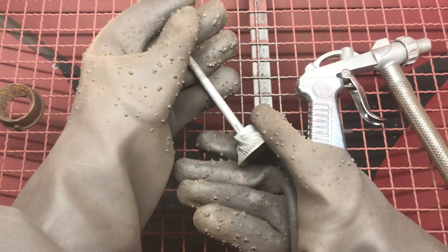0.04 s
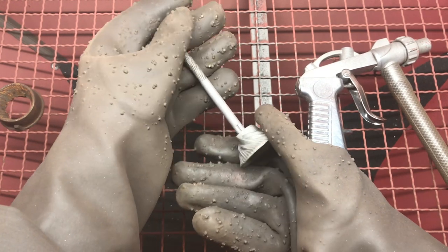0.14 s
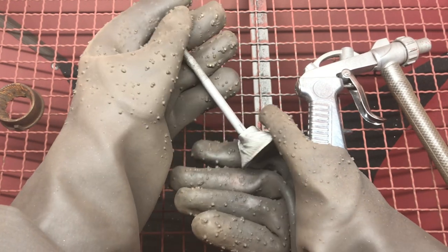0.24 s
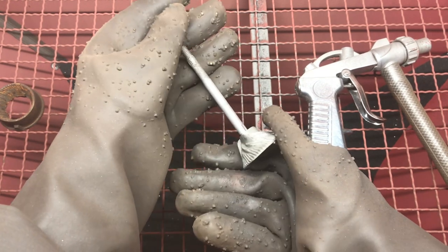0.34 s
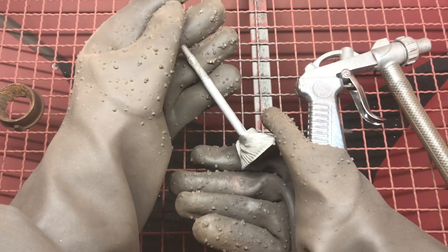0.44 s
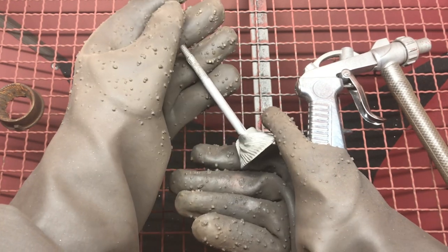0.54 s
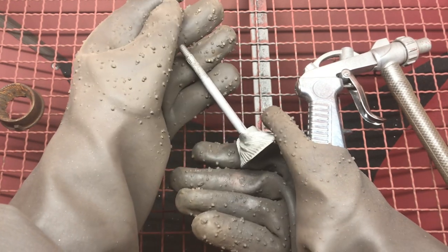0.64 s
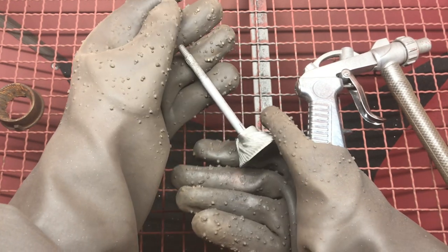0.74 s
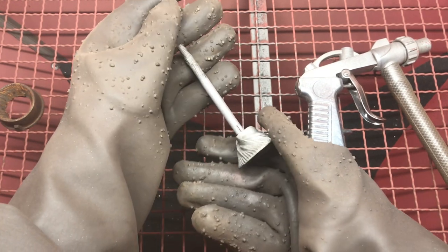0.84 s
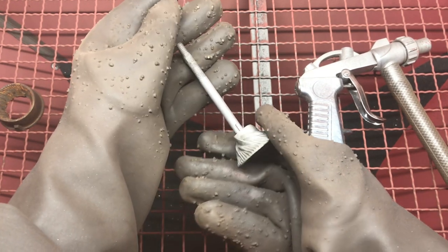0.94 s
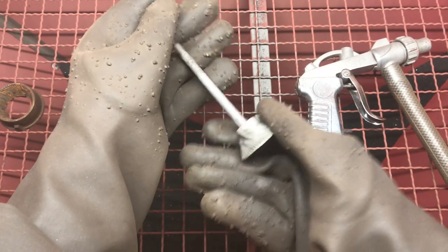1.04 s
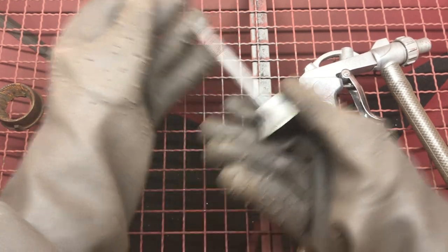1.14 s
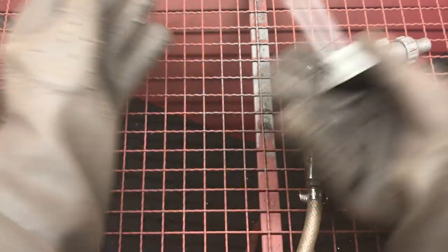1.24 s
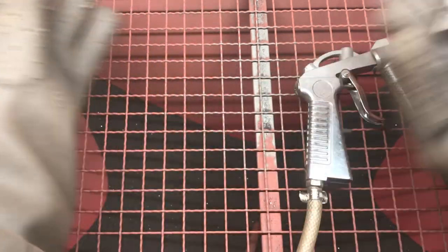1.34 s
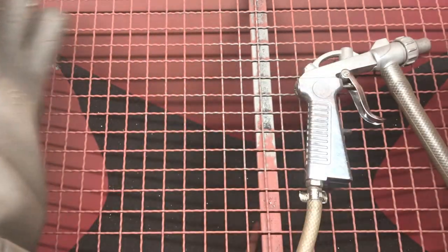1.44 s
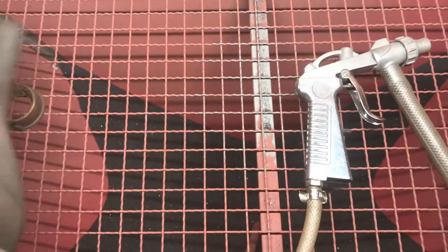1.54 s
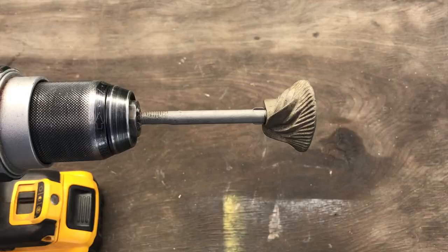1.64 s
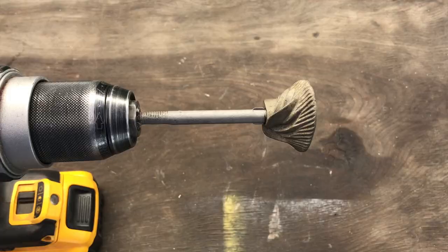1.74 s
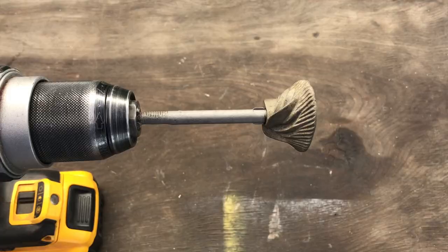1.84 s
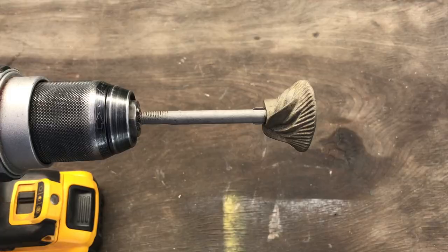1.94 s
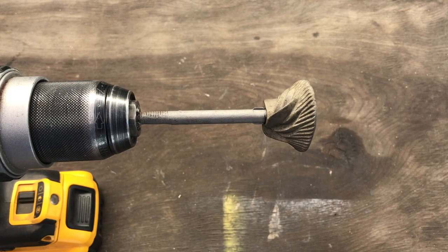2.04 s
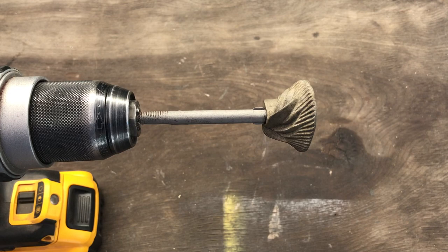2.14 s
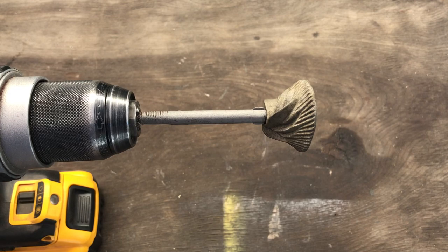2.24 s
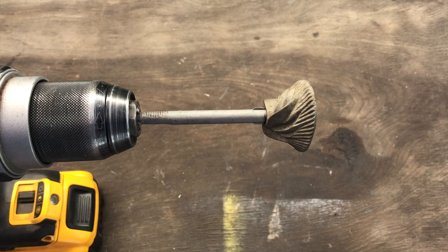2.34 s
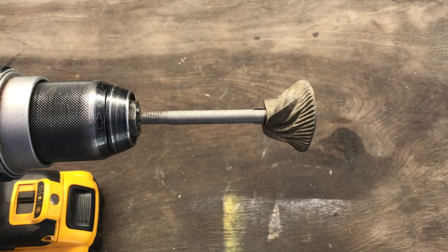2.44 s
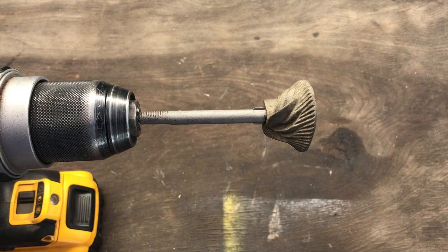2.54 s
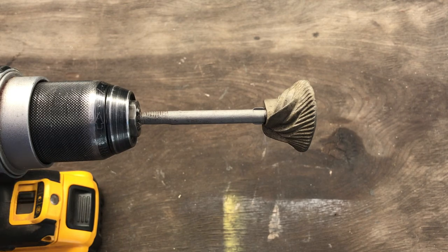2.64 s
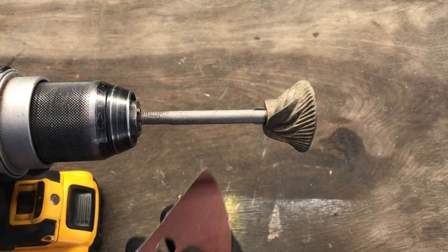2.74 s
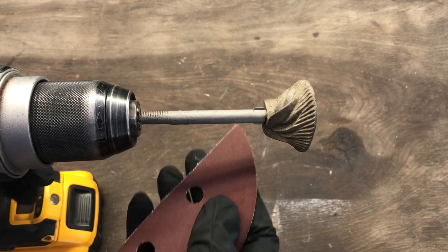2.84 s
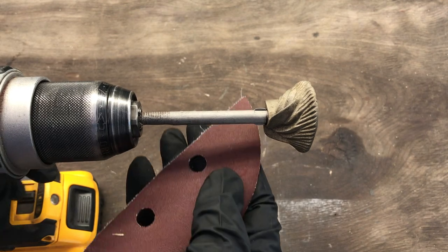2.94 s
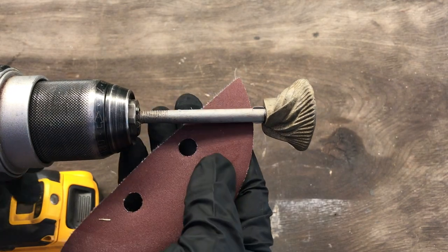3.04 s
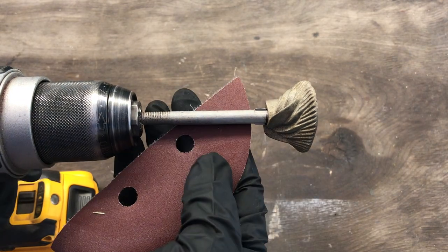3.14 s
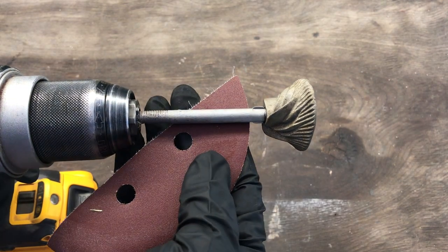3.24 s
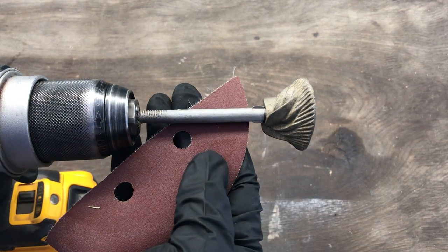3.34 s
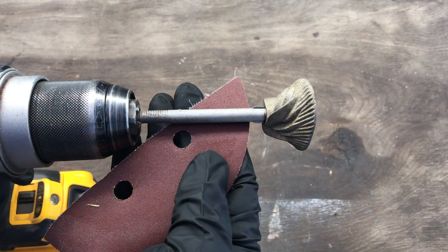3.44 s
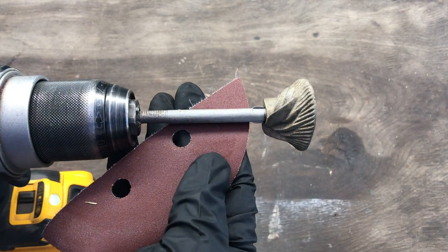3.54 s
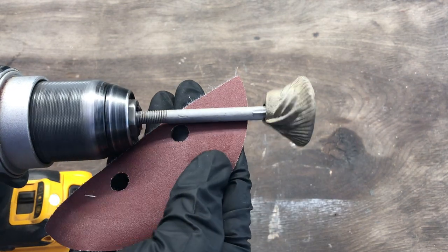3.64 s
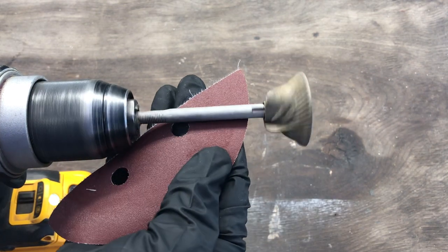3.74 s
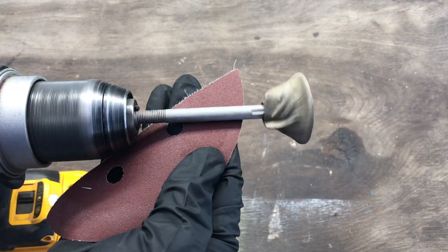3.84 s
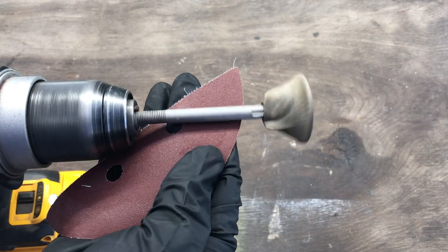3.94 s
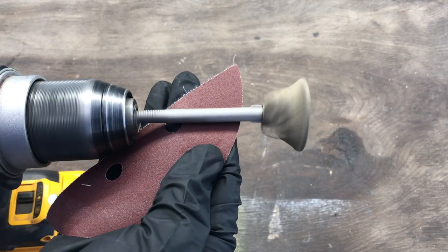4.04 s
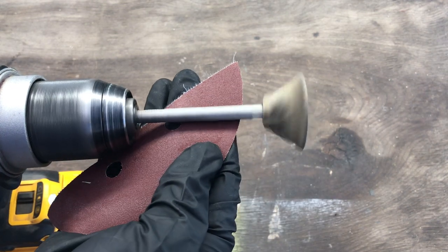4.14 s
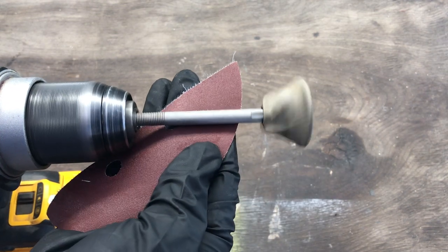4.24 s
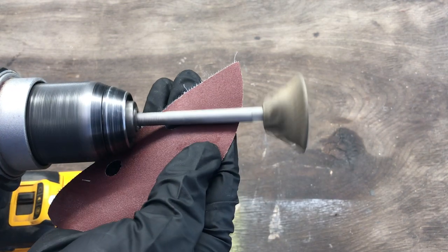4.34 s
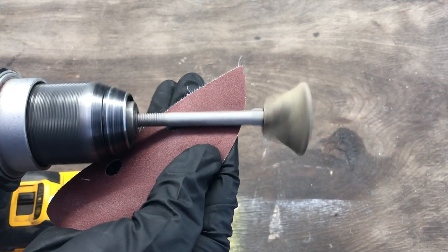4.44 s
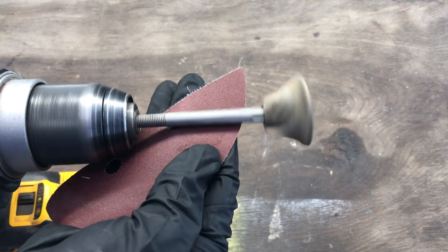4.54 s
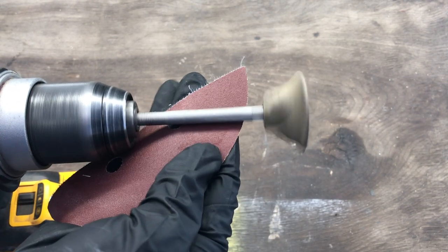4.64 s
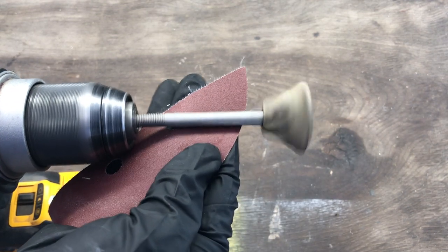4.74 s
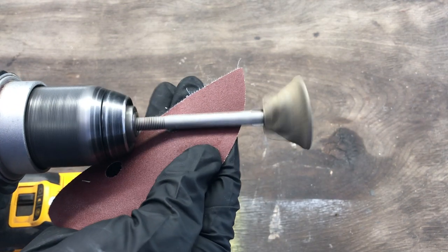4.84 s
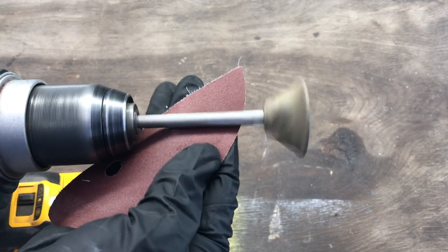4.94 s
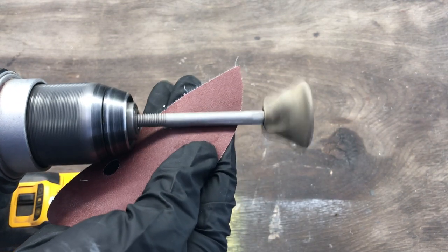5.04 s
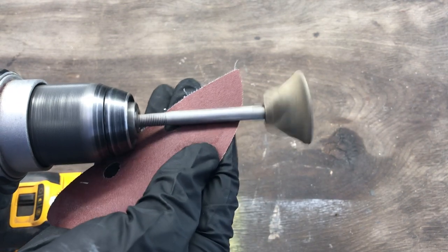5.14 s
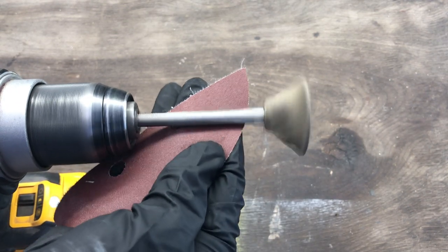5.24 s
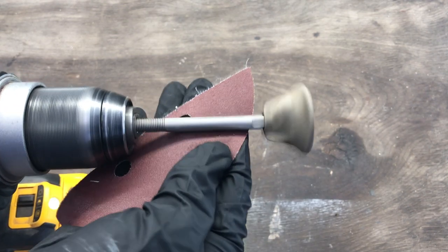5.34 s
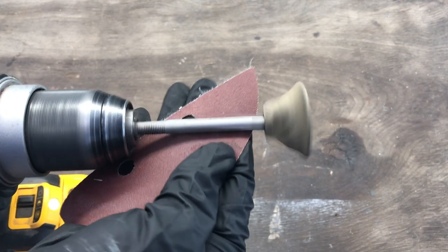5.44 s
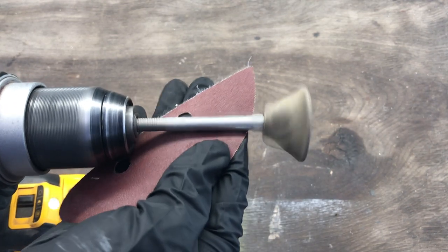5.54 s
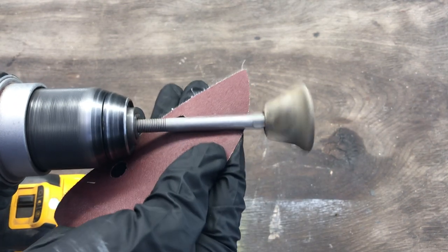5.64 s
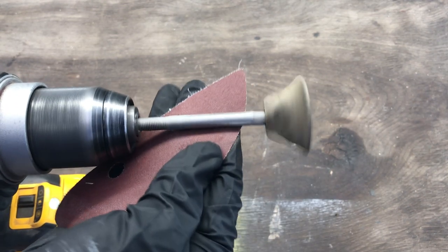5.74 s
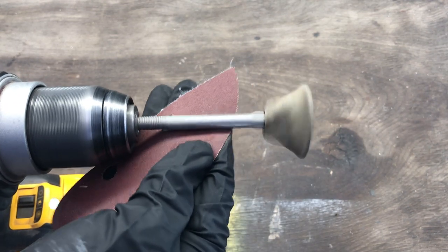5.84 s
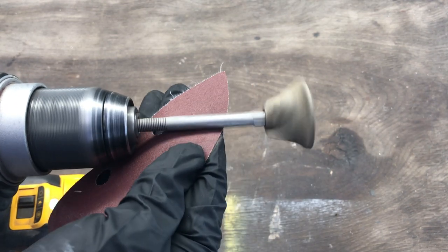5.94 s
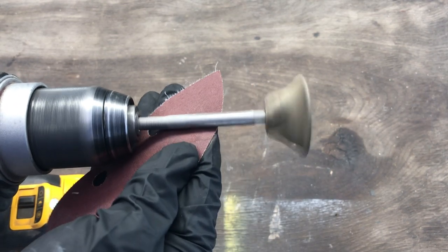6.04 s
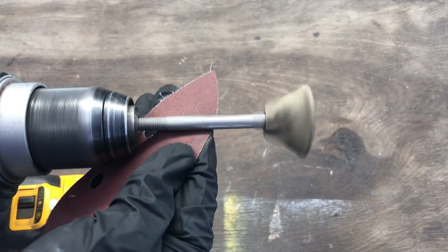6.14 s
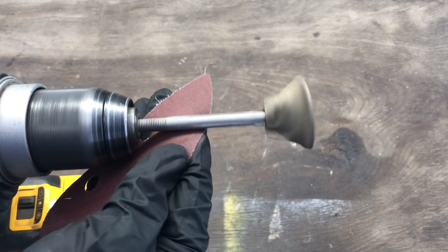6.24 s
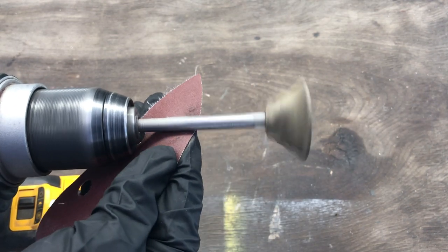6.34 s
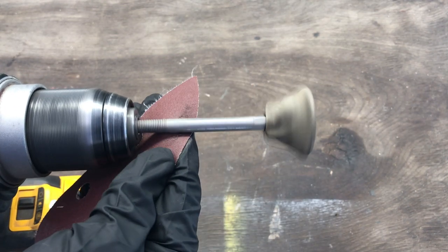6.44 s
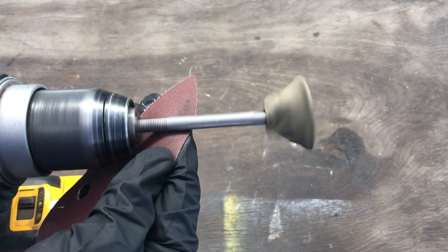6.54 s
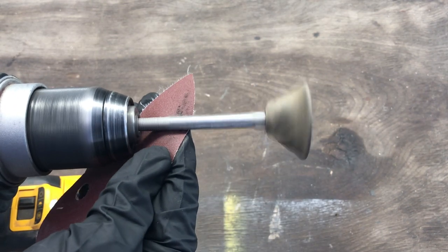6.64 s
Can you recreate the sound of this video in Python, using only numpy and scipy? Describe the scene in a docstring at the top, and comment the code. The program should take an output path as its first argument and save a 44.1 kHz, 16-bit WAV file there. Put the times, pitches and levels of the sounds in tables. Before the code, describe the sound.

A dust extractor drones and cuts off, then paper rustles on a quiet bench before a cordless drill whines up with hissing sandpaper.

```python
"""At a blasting cabinet standing idle, the dust extractor drones in steady tones and air noise rings in the
box. Then the scene changes to a quiet workshop bench that fades in, distant rumble behind it, all on one
microphone. Gloves and sandpaper rustle as shaped noise, a hand thuds softly and stiff paper snaps in bright
ticks. A trigger clicks in the modes of its grip, and a cordless drill spins up in steps: multiples of the rotor
rate whine through the casing over gear noise, while paper rubs the turning steel shaft with a throbbing hiss."""
import sys
import numpy as np
from scipy import signal
from scipy.fft import rfft, irfft
from scipy.io import wavfile

SR = 44100
rng = np.random.default_rng(int(sys.argv[2]) if len(sys.argv) > 2 else 0)


def natural_amplitude(level_db):
    """Convert a level in decibels to a linear amplitude factor, elementwise."""
    exponent = np.asarray(level_db, float) / 20
    return 10 ** exponent


def file_out(sig):
    """Save sig as 16-bit WAV at sys.argv[1]."""
    # one column per channel
    cols = np.atleast_2d(sig).T
    # limit, then scale
    lim = np.clip(cols, -1, 1)
    pcm = np.round(lim * 32767).astype(np.int16)
    wavfile.write(sys.argv[1], SR, pcm)


N = 295470
TIME_S = np.arange(N) / SR
CABINET_ENDS_S, TRIGGER_S = 1.674, 3.5527
FULL_SPEED_HZ = 385  # rotor turns per second to which the drill levels refer


def at_hz(points, hz):
    """A spectrum table read on a log-frequency axis."""
    table_hz, table_db = np.transpose(points)
    return np.interp(np.log(np.maximum(hz, 1)), np.log(table_hz), table_db)


def rms_one(x):
    """Scale to unit rms."""
    return x / np.sqrt(np.mean(x ** 2) + 1e-20)


def white():
    """Flat noise over the whole take."""
    return rng.standard_normal(N)


def drift(rate):
    """Slow random wander of unit rms: noise through a double one-pole low-pass at rate Hz."""
    stride = 40  # samples per coarse step
    r = np.exp(-2 * np.pi * rate * stride / SR)
    coarse = rng.standard_normal(N // stride + 2002)
    slow = signal.lfilter([1], [1, -2 * r, r * r], coarse)[2000:]  # drop the settling
    return np.interp(np.arange(N) / stride, np.arange(len(slow)), rms_one(slow))


def coloured(x, spectrum, peaks=(), edge_db=-25):
    """Give x a spectrum with resonances on top, changed by edge_db an octave below the table. Rms 1."""
    hz = np.fft.rfftfreq(N, 1 / SR)
    lowest_hz, lowest_db = spectrum[0]
    db = at_hz([(lowest_hz / 2, lowest_db + edge_db)] + list(spectrum), hz)
    for centre, width, top in peaks:
        db = db + top / (1 + (2 * (hz - centre) / width) ** 2)
    return rms_one(irfft(rfft(x) * natural_amplitude(db), N))


def grains(per_s, spread_db):
    """Random clicks of uneven size and either sign, together of unit rms."""
    sizes = natural_amplitude(spread_db * np.minimum(rng.exponential(1, N), 5)) * rng.choice([-1, 1], N)
    return rms_one(sizes * (rng.random(N) < per_s / SR))


def after(s, fade):
    """0 before a moment, rising to 1 over the fade."""
    return np.clip((TIME_S - s) / fade, 0, 1)


def drill():
    """Rotor tones, gear noise, sanding hiss and bench rumble follow the stepped speed and the strain."""
    # rotor speed as the trigger is squeezed in steps: t/s, f/Hz (turns per second)
    speed_steps = [(3.56, 45), (3.7, 63), (3.725, 67.5), (3.832, 71.5), (3.85, 79), (3.905, 87),
                   (3.918, 153), (3.948, 184), (3.976, 197.4), (4.03, 204), (4.09, 206), (4.125, 220),
                   (4.162, 262), (4.2, 290), (4.335, 296), (4.35, 345), (4.363, 384), (4.376, 394),
                   (4.42, 385.6), (4.5, 384.5)]
    gear_ratio = 11.42  # rotor turns per chuck turn
    speed = np.interp(TIME_S, *np.transpose(speed_steps))
    chuck_hz = speed / gear_ratio
    chuck = 2 * np.pi * np.cumsum(chuck_hz) / SR
    octaves = np.log2(speed / FULL_SPEED_HZ)
    # the speed shakes at random and once per chuck turn, and the planet stage shakes it once per two
    shake = .001 * drift(12) + .0016 * np.sin(chuck) + .002 * np.sin(chuck / 2 + drift(3))
    speed = speed * (1 + shake)
    octaves = np.log2(speed / FULL_SPEED_HZ)
    rotor = 2 * np.pi * np.cumsum(speed) / SR

    wake_s = 0.26
    asleep = np.exp(-(np.maximum(TIME_S - TRIGGER_S, 0) / wake_s) ** 2)
    effort = strain()

    def layer_db(full_db, octave_db, strain_db, start_db):
        """Level at full speed, its rise per octave and with full strain, less the hold-back at first touch."""
        return full_db + octave_db * octaves + strain_db * effort - start_db * asleep

    # later the hiss sinks, perhaps as the paper wears smooth, while the gear noise grows
    worn_s = np.maximum(TIME_S - 5.7, 0)
    tone_db = layer_db(3.57, 2.45, 1.4, 18)
    gear_db = layer_db(-44, 4.5, 5, -3) + 2.1 * worn_s + 0.59 * drift(2.5)  # a little louder at the start
    hiss_db = layer_db(-43, 1.44, 5, 8.5) - 1.5 * worn_s + 0.14 * drift(8.3) - octaves * drift(33)
    bench_db = layer_db(-58.5, 0.1, 3.5, 7.5) + 0.5 * drift(4.1)

    tones = motor_whine(speed, rotor, octaves) + gearbox_hum(rotor, chuck, octaves)
    layers = np.sqrt(2) * natural_amplitude(tone_db) * tones
    layers += natural_amplitude(gear_db) * gear_noise(rotor, chuck)
    layers += natural_amplitude(hiss_db) * sanding_hiss(rotor, chuck, chuck_hz)
    layers += natural_amplitude(bench_db) * bench_rumble()
    layers += controller_whistle(effort)
    return after(TRIGGER_S, 0.0047) * layers


def strain():
    """The finger squeezes further and the motor strains: each surge rises fast, then eases, by one law."""
    # t/s of greatest strain, strength 0-1
    squeezes = [(3.715, 0.74), (3.845, 1), (3.922, 0.6), (4.15, 0.4), (4.37, 0.42)]
    rise_s, fall_s = 0.023, 0.069
    effort = np.zeros(N)
    for s, size in squeezes:
        decay = np.where(TIME_S < s, ((s - TIME_S) / rise_s) ** 2, (TIME_S - s) / fall_s)
        effort += size * np.exp(-decay)
    return effort


def motor_whine(speed, rotor, octaves):
    """Multiples of the rotor rate, louder at casing resonances, broken and rough at low speed."""
    # the windings pull at any speed; unbalance puts neighbours beside them only near full speed
    # multiple of the rotor rate (rounded for the tone, as written for the casing),
    # relative level/dB at full speed, gain/dB per octave of speed
    orders = [(0.97, -40.5, 3), (1.95, -56, 12), (3.08, -58, 6), (4.05, -47, 2), (5.1, -48.5, 1),
              (6.945, -53.5, 25), (7.88, -38, 11), (9.05, -53, 36), (10.24, -50, -2), (11.1, -50.5, 34),
              (12.5, -62, -7), (14, -60, -6), (15, -42.5, 61), (16.49, -41, 0), (17.11, -48.5, 39),
              (19.48, -59, -10.5), (23, -57, 33), (24.1, -64, 21)]
    # how well the casing radiates a tone: f/Hz, relative level/dB
    casing = [(60, -25), (200, -14.5), (385, -10.5), (640, -19.5), (830, -6.5), (1100, -2.5), (1380, -9.5),
              (1600, -21.5), (1950, -27), (2400, -11.5), (3080, -0.5), (3700, -11.5), (4300, -9),
              (4750, -31), (6100, -9)]
    slot_order, start_up_hz, mute_db = 16, 120, 11
    # below the start-up speed only the slot tone stands out
    starting = 1 / (1 + (speed / start_up_hz) ** 8)
    whine = np.zeros(N)
    for k, db, slope_db in orders:
        tone_db = db + slope_db * octaves + at_hz(casing, k * speed)
        if round(k) != slot_order:
            tone_db = tone_db - mute_db * starting
        rough_db = (1.0 - 0.74 * octaves) * drift(37)
        whine += natural_amplitude(tone_db + rough_db) * np.sin(round(k) * rotor + 2 * np.pi * rng.random())
    return whine * after(3.7, 0.026)


def gearbox_hum(rotor, chuck, octaves):
    """Multiples of the chuck rate hum, and the gearbox beats against the rotor."""
    # multiple of the chuck rate, relative level/dB at full speed
    orders = [(2, -71.5), (4, -65.5), (5.5, -74.5)]
    hum = sum(natural_amplitude(db + 32 * octaves + 3.1 * drift(26)) * np.sin(k * chuck) for k, db in orders)
    return hum + natural_amplitude(-60) * np.sin(rotor) * np.sin(2 * chuck)


def gear_noise(rotor, chuck):
    """Broad noise of the gears, throbbing with rotor and chuck."""
    # f/Hz, relative level/dB per Hz
    spectrum = [(200, -21), (300, -7.5), (504, -12), (701, -16.5), (1000, -10), (1350, -4.5), (1600, -12.5),
                (2100, -13), (2900, -6), (3500, -9.5), (4210, -2.5), (5000, -13.5), (7000, -25),
                (15700, -36), (16100, -78)]
    throb = (1 + 0.39 * np.sin(rotor)) * (1 + 0.067 * np.sin(chuck))
    return coloured(white() * throb, spectrum, edge_db=-9)


def sanding_hiss(rotor, chuck, chuck_hz):
    """Grit rubbing the shaft: noise and scattered grains that throb with rotor and chuck."""
    # f/Hz, relative level/dB per Hz
    spectrum = [(3500, -7), (4500, -34), (5300, -10.5), (6200, -5.5), (7300, -8.5), (8900, -5),
                (10600, -14.5), (12500, -7.5), (13800, -12.5), (15300, -8), (16100, -46), (16500, -66)]
    grains_per_s = 30 * chuck_hz * natural_amplitude(4 * drift(37))
    grit = white() + .5 * grains(grains_per_s, spread_db=1.0)
    throb = (1 + 0.051 * np.sin(rotor + 1)) * (1 + 0.058 * np.sin(chuck + 2))
    return coloured(grit * throb, spectrum)


def bench_rumble():
    """Low noise of the bench top shaken by the drill."""
    # f/Hz, relative level/dB per Hz
    spectrum = [(40, -28), (65, -1), (100, -28), (150, -3.5), (220, -0.5), (330, -20), (600, -43)]
    return coloured(white(), spectrum)


def controller_whistle(effort):
    """The speed controller whistles at part throttle, swelling just after the strain, then quits."""
    # f/Hz, relative level/dB
    tones = [(11014, -8), (11262, -7)]
    lag_s = 0.01
    swell = np.interp(TIME_S - lag_s, TIME_S, effort) ** 2 * (1 - after(3.84, .04))
    whistle = sum(natural_amplitude(db + 3.5 * drift(28)) * np.sin(2 * np.pi * hz * TIME_S) for hz, db in tones)
    return natural_amplitude(-44) * swell * whistle


def cabinet():
    """Extractor tones that waver one by one, over air noise ringing in the sheet-metal box."""
    # extractor tones: multiple of the turning rate, relative level/dB
    orders = [(1, -2.5), (2, -6), (3, -17), (4, -2), (8, -6), (9, -36), (10, 1.5), (11, 4), (13, -22),
              (39, -15), (85, -46), (86, -22), (87, -26), (88, -24), (89, -24), (90, -20)]
    # thin tones of the fan and duct: f/Hz, relative level/dB
    whistles = [(271.4, -3), (675.4, -8.5), (2252, -14.5), (2630, -13), (3138, -15), (4505, -25.5)]
    # air rush: f/Hz, relative level/dB per Hz
    rush_spectrum = [(34, -34), (58, -9.5), (130, -10), (185, -7), (223, -8), (487, -12.5), (548, -9.5),
                     (763, -15), (967, -7), (1590, -17.5), (2610, -13), (7560, -40), (13700, -45),
                     (15400, -42), (16500, -73)]
    # box and duct resonances: f/Hz, width/Hz, level/dB above the rush
    box = [(298, 29, 7.5), (377, 100, 15), (1070, 160, -1.5), (2000, 200, 5), (2700, 620, 6.5),
           (4200, 160, 1), (9570, 680, 10.5), (13350, 1500, 13)]
    turn_hz = 44.7  # mean turns per second
    turns = np.cumsum(turn_hz * (1 + .0002 * drift(1.5))) / SR
    tones = np.zeros(N)
    for k, db in orders:
        tones += natural_amplitude(db + 0.63 * drift(2.7)) * np.sin(2 * np.pi * (k * turns + rng.random()))
    seconds = turns / turn_hz  # the whistles share the unsteadiness of the turning
    for hz, db in whistles:
        tones += natural_amplitude(db + 2.84 * drift(3.3)) * np.sin(2 * np.pi * hz * seconds)
    rush = coloured(white(), rush_spectrum, box) * natural_amplitude(.35 * drift(8))
    return natural_amplitude(-49.5) * np.sqrt(2) * tones + natural_amplitude(-40) * rush


def trigger():
    """A sharp click and a short rattle strike the plastic modes of the grip."""
    # f/Hz, relative level/dB, 60 dB decay time t60/s
    modes = [(1330, -13, 0.016), (4100, -2, 0.0029), (5370, -15, 0.0053), (8240, -2, 0.002),
             (13200, -6, 0.0027), (247, -24, 0.019)]
    rattle_s = 0.011
    rattle = after(TRIGGER_S, 0.00039) * (1 - after(TRIGGER_S + rattle_s, 0.0029))
    out = np.zeros(N)
    for hz, db, t60 in modes:
        force = 0.38 * rattle * grains(3610, spread_db=4.5) + 1e-18
        force[round((TRIGGER_S + .0008) * SR)] += 3  # the click
        r, w = natural_amplitude(-60 / (t60 * SR)), 2 * np.pi * hz / SR
        out += natural_amplitude(db) * signal.lfilter([0, np.sin(w)], [1, -2 * r * np.cos(w), r * r], force)
    return natural_amplitude(-43) * out


def snaps():
    """Each snap of the stiff paper is a bright tick with a short noisy tail."""
    # t/s as the sheet starts to give, peak level/dB
    paper_snaps = [(2.6805, -59), (2.9386, -49), (3.0501, -43), (3.069, -32), (3.0738, -55), (3.1447, -55),
                   (3.1577, -43.5), (3.1955, -55), (3.2122, -39), (3.2668, -49), (3.2707, -40),
                   (3.2757, -51), (3.2895, -52), (3.2922, -55), (3.2974, -54), (3.3782, -34), (3.4655, -47),
                   (3.4864, -53), (3.5254, -48.5), (3.5917, -31.5), (3.6064, -28.5), (3.6194, -38),
                   (3.6331, -27), (3.6377, -35), (3.665, -32), (3.686, -36), (3.696, -37)]
    give_s, tail_share, tail_s = .0009, 0.12, 0.0022
    out, t = np.zeros(N), np.arange(600) / SR
    edge = signal.butter(2, [4900, 16500], "band", fs=SR, output="sos")
    for s, db in paper_snaps:
        tick = rng.standard_normal(600) * (np.exp(-t / 0.00031) + tail_share * np.exp(-t / tail_s))
        tick[0] += 2  # the break itself
        tick = signal.sosfilt(edge, tick)
        out[round((s + give_s) * SR):][:600] += natural_amplitude(db) * tick / np.abs(tick).max()
    return out


def handling():
    """Glove and paper rustle, dull and bright; once held, the sheet also crackles faintly throughout."""
    # dull swish: f/Hz, relative level/dB per Hz
    swish_spectrum = [(2400, -10), (3200, 5), (4300, -2), (6000, -19), (9000, -40)]
    # bright scuff: f/Hz, relative level/dB per Hz
    scuff_spectrum = [(2000, -33), (5500, -1.5), (9000, -5), (15000, -7), (16300, -23)]
    swish = natural_amplitude(0.37 * drift(37)) * coloured(white(), swish_spectrum)
    rough = white() + .4 * grains(900 * natural_amplitude(4 * drift(25)), spread_db=3.0)
    scuff = coloured(rough, scuff_spectrum) * natural_amplitude(2.4 * drift(30))
    held = after(2.4, .02) * natural_amplitude(-86 + 4.5 * drift(11))
    dull = rustle(column=2, sag_db_per_s=60) * swish
    bright = (rustle(column=3, sag_db_per_s=23) + held) * scuff
    return dull + bright


def rustle(column, sag_db_per_s):
    """Each rustle rises, sags in level after its rise, and lets go (worked out every millisecond)."""
    # start t/s, hold/s, dull swish level/dB, bright scuff level/dB
    moves = [(1.994, 0.042, -68.5, -80), (2.053, 0.19, -74, -76.5), (2.43, .004, -71, -75),
             (2.527, 0.11, -74.5, -80.5), (2.652, .006, -73, -88), (2.83, .05, -84, -86),
             (2.915, .006, -83, -91), (3.017, .02, -78, -79), (3.11, 0.0078, -88, -93),
             (3.25, .02, -87, -81), (3.35, 0.018, -84, -84), (3.443, .015, -87.5, -91.5)]
    rise_s, fall_s = 0.034, 0.065
    t = np.arange(0, N / SR, .001)
    shape = np.zeros(len(t))
    for row in moves:
        start_s, hold_s = row[:2]
        top = t - start_s - rise_s  # time since the rise ended
        rise = np.clip(1 + top / rise_s, 0, 1)
        fall = np.clip(1 - (top - hold_s) / fall_s, 0, 1)
        shape += natural_amplitude(row[column] - sag_db_per_s * np.maximum(top, 0)) * (rise * fall) ** 2
    return np.interp(TIME_S, t, shape)


def thuds():
    """A hand lands on the bench: a soft push of low noise that dies in a few hundredths of a second."""
    # t/s, peak level/dB
    landings = [(2.476, -56), (2.681, -48)]
    out, t = np.zeros(N), np.arange(4000) / SR
    low_band = signal.butter(2, [120, 450], "band", fs=SR, output="sos")
    for s, db in landings:
        push = signal.sosfilt(low_band, rng.standard_normal(4000) * np.exp(-t / 0.0082))
        out[round(s * SR):][:4000] += natural_amplitude(db) * push / np.abs(push).max()
    return out


def workshop():
    """Distant workshop rumble: low noise that sinks slightly at first, then holds."""
    # f/Hz, relative level/dB per Hz
    spectrum = [(15, -46), (25, -17), (92, -5.5), (238, -11.5), (275, -15), (399, -19.5), (544, -25),
                (591, -17.5), (823, -17.5), (1100, -14.5), (2570, -33.5), (3500, -48), (4550, -59),
                (7700, -120)]
    sink_db = 1.0 * np.clip(TIME_S - CABINET_ENDS_S, 0, 1.2)  # 1 dB per second
    return natural_amplitude(-57.5 - sink_db) * coloured(white(), spectrum)


def mic_hiss():
    """Steady faint noise of the microphone."""
    return natural_amplitude(-85) * coloured(white(), [(2000, 8.5), (8000, -6), (13000, -6), (16000, -35)])


def scene():
    """The scene changes from the cabinet to the bench, which fades in; one microphone on two equal channels."""
    bench = drill() + trigger() + snaps() + handling() + thuds() + workshop() + mic_hiss()
    first = cabinet() * (1 - after(CABINET_ENDS_S - .001, 0.0016))
    mono = first + bench * after(CABINET_ENDS_S, 0.016)
    return np.array([mono, mono])


def band_limit(x):
    """A steep low-pass at the top of the band."""
    return signal.sosfilt(signal.butter(12, 16790, fs=SR, output="sos"), x)


def record(dry):
    """A steep low-pass cuts the top, 40 dB down from 16.3 kHz."""
    top_cut = signal.cheby2(12, 40, 16300, fs=SR, output="sos")
    mix = signal.sosfilt(top_cut, dry)
    return band_limit(mix)


dry = scene()
out = record(dry)
file_out(out)
```